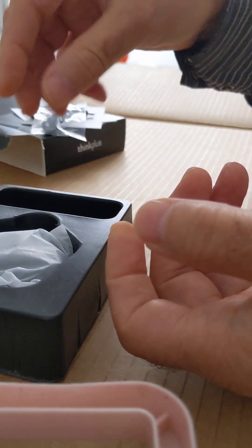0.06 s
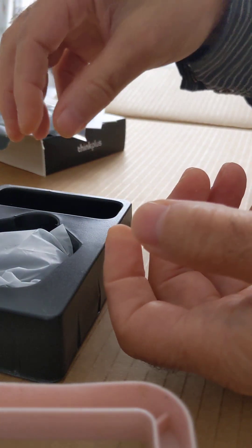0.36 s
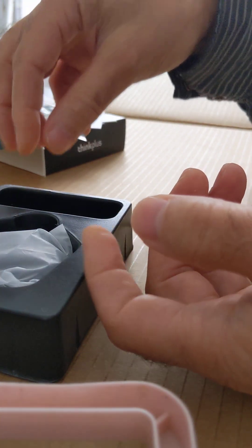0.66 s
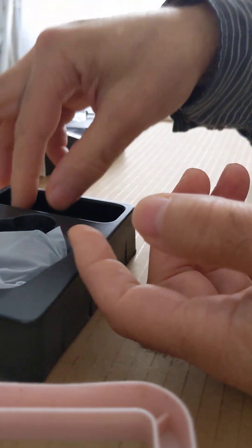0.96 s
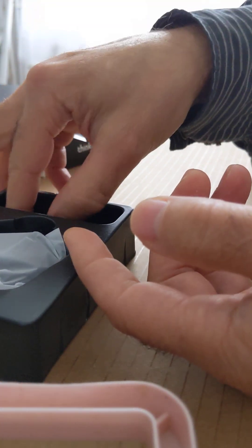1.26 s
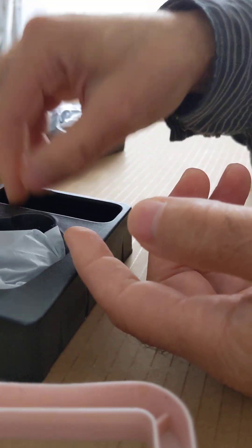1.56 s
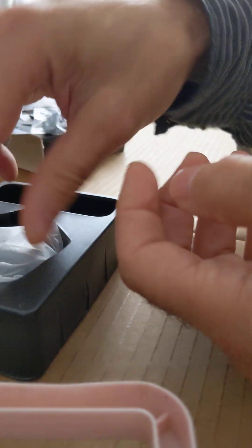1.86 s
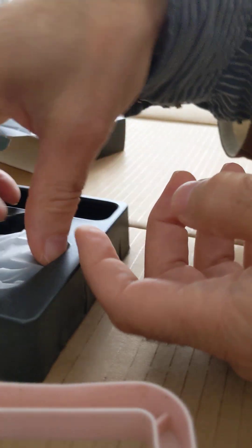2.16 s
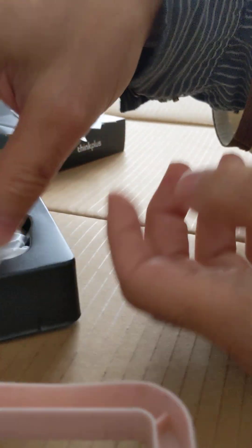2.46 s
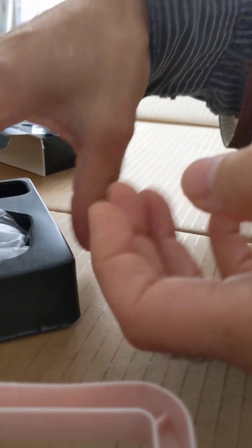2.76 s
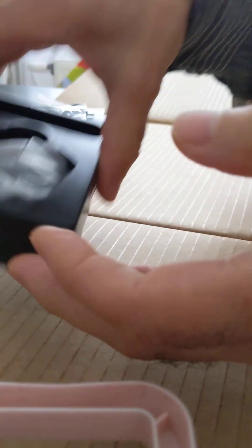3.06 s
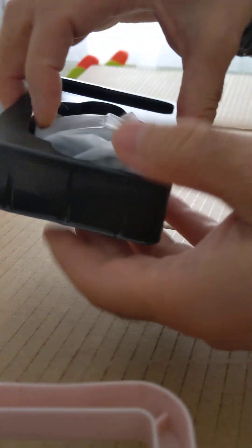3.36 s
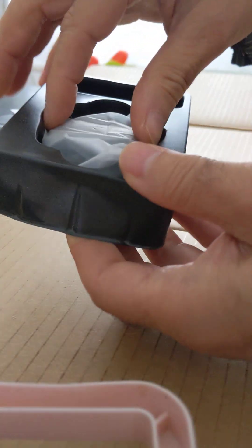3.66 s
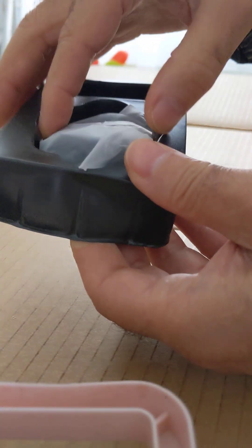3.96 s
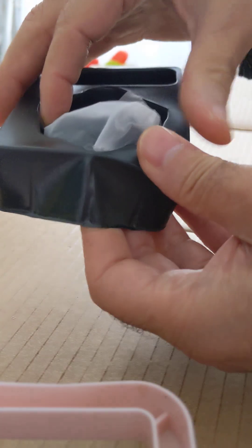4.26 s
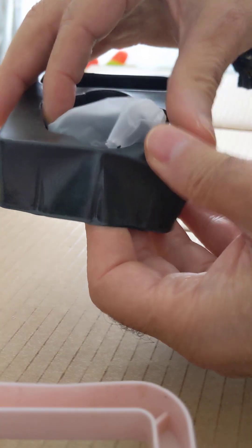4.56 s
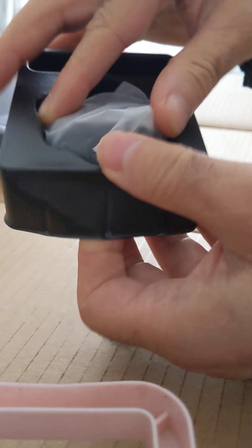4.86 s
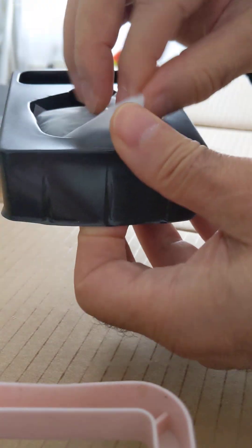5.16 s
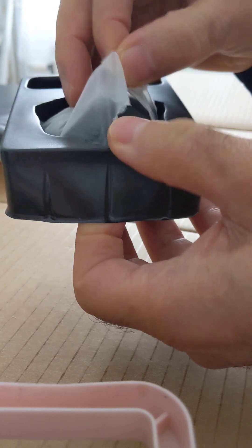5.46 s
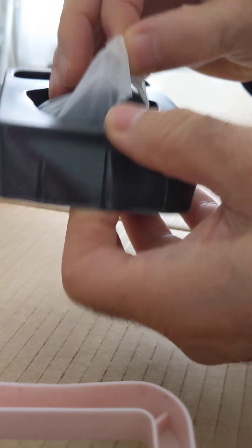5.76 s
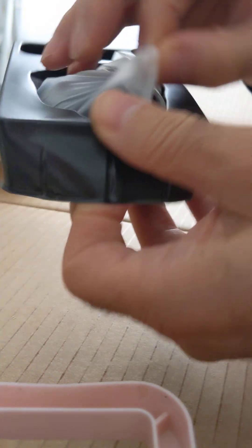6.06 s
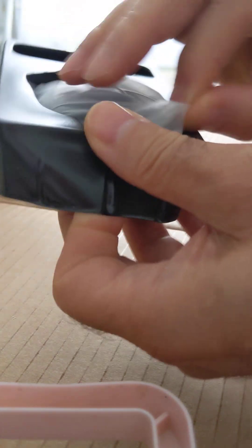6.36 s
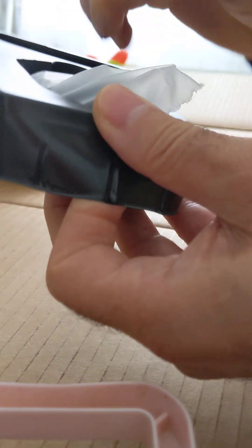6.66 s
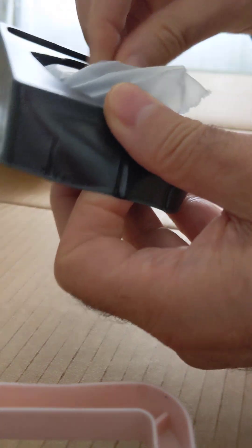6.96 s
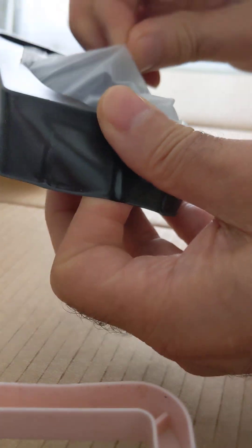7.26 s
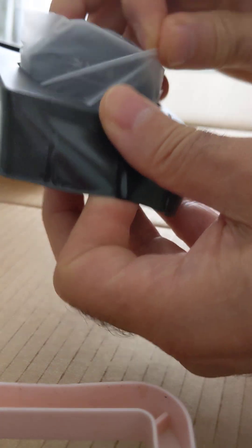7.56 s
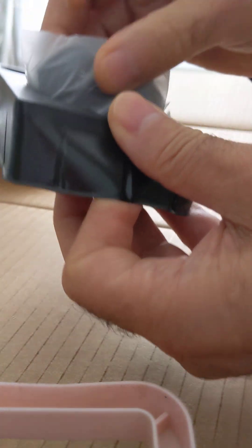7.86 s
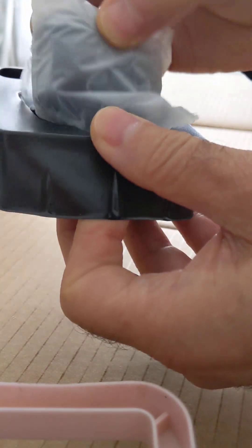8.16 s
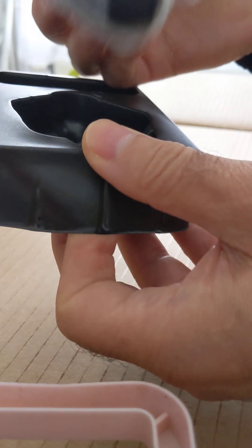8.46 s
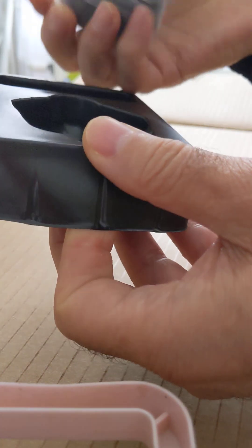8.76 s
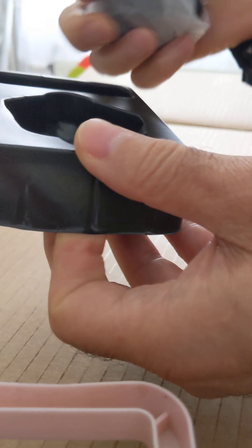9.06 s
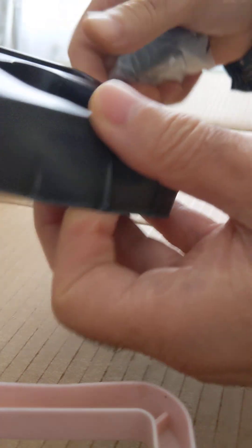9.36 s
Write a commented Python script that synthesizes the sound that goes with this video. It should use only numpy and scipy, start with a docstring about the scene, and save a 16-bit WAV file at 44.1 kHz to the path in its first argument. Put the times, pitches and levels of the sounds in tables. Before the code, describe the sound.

Close to the microphone in a small, quiet room, hands handle a moulded plastic tray. One loud, sharp snap like a static spark comes early. Fingers then rub, tap and briefly squeak on the tray, which bumps softly on cardboard. A thin plastic bag hisses and crackles in short tugs between hollow knocks, then comes free and crinkles more densely. A faint hum lies underneath.

```python
"""A small room, close to a phone: hands work an item in a thin plastic bag out of a moulded plastic tray.
Fingers rub, knock and squeak on the tray, which drums on a cardboard sheet; at each tug the film hisses
and crackles, and its creases flip. An early touch draws a loud snap, probably a static spark.
Near the end the bag comes free and resounds. Faint mains hum lies under it all."""
import sys
import numpy as np
from scipy import signal
from scipy.fft import rfft, irfft, next_fast_len
from scipy.io import wavfile

SR = 44100
rng = np.random.default_rng(int(sys.argv[2]) if len(sys.argv) > 2 else 0)


def dump_mix(stems):
    """Bounce the given channels to the path in sys.argv[1] as a 16-bit WAV at rate SR."""
    frames = np.atleast_2d(stems).T  # one column per channel
    limited = np.clip(frames, -1, 1)  # hard clip at full scale
    pcm = np.round(limited * 32767).astype(np.int16)
    wavfile.write(sys.argv[1], SR, pcm)


N = 414540
TIME = np.arange(N) / SR
HIT_TIME = TIME[:2048]


def undb(db):
    """Decibels to gain."""
    return 10 ** (np.asarray(db) / 20)


def unit(x):
    """Scale to rms 1."""
    return x / np.sqrt(np.mean(x ** 2))


def curve(table):
    """A (time, value) table, sample by sample."""
    return np.interp(TIME, *np.transpose(table))


def along(hz, points_hz, values):
    """Interpolate on a log-frequency axis."""
    return np.interp(np.log(hz + 1), np.log(points_hz), values)


def butter(x, order, hz, kind):
    """Causal Butterworth filter."""
    return signal.sosfilt(signal.butter(order, hz, kind, fs=SR, output="sos"), x)


def colour(x, spectrum):
    """Minimum-phase filter from a (frequency, gain) table, via the cepstrum."""
    size = next_fast_len(x.shape[-1] + 4096, real=True)
    gain_db = along(np.fft.rfftfreq(size, 1 / SR), *np.transpose(spectrum))
    cepstrum = irfft(np.log(undb(gain_db)), size)
    cepstrum[1:size // 2] *= 2
    cepstrum[size // 2 + 1:] = 0
    return irfft(rfft(x, size) * np.exp(rfft(cepstrum)), size)[..., :x.shape[-1]]


def resonance(x, hz, width_hz):
    """Narrow resonance with a moving centre; gain 1 at the centre."""
    turn = np.exp(2j * np.pi * np.cumsum(hz) / SR)
    pole = np.exp(-np.pi * width_hz / SR)
    return 2 * np.real(turn * signal.lfilter([1 - pole], [1, -pole], x / turn))


def walk(rate_hz):
    """Random wander, spread near 1."""
    knots = rng.standard_normal(int(N / SR * rate_hz) + 2)
    return np.interp(TIME * rate_hz, np.arange(len(knots)), knots)


def grains(per_s, spread_db, cap):
    """Random impulses of steady power, mostly small; sizes span cap * spread_db."""
    chance, size = rng.random(N), np.minimum(rng.exponential(size=N), cap)
    return unit((chance < per_s / SR) * undb(spread_db * size) * rng.choice([-1, 1], N) / np.sqrt(per_s))


def burst(envelope):
    """Short noise burst, whitened to an even spectrum."""
    x = rng.standard_normal(len(envelope)) * envelope
    for _ in range(4):
        spectrum = rfft(x)
        x = irfft(spectrum / (np.abs(spectrum) + 1e-12), len(x)) * np.sqrt(envelope)
    return unit(x)


def stroke(start_s, attack_s, hold_s, swell, release_s):
    """Gain of one hand movement: rises as time ** swell, holds, decays."""
    age = np.maximum(TIME - start_s, 0)
    release = np.exp(-np.clip((age - attack_s - hold_s) / release_s, 0, 20))
    return np.minimum(age / attack_s, 1) ** swell * release


def strokes(table, swell, release_s):
    """Summed power of all movements, and their last column weighted by power."""
    power, weighted = np.zeros((2, N))
    for start_s, attack_s, hold_s, db, quality in table:
        one = (undb(db) * stroke(start_s, attack_s, hold_s, swell, release_s)) ** 2
        power += one
        weighted += one * quality
    return power, weighted


def add(out, start_s, sound):
    """Mix in a stereo sound."""
    i = int(start_s * SR)
    out[:, i:i + sound.shape[1]] += sound[:, :N - i]


def ports(x, lag_ms, scatter, spread_ms):
    """Two microphone ports: the right hears later; each gets its own reflections off hands and tray."""
    age = TIME[:512]
    paths = rng.standard_normal((2, len(age))) * np.exp(-age * 1000 / spread_ms)
    paths *= scatter / np.linalg.norm(paths, axis=1, keepdims=True)
    paths[0, 0] += 1
    paths[1, int(lag_ms * SR / 1000 * rng.uniform(.5, 1.5))] += 1
    return signal.oaconvolve(x[None], paths, axes=1)[:, :len(x)] / np.sqrt(1 + scatter ** 2)


def moving_ports(x, lag_ms, scatter, spread_ms, size=8192):
    """The hands move, so each short stretch takes new paths to the ports."""
    out = np.zeros((2, N))
    for i in range(0, N - size // 4, size // 2):
        part = x[i:i + size]
        add(out, i / SR, ports(part * signal.windows.hann(size)[:len(part)], lag_ms, scatter, spread_ms))
    return out


def hit_level(pair, db, left_db):
    """Set a hit's rms over its first 4 ms, and its balance."""
    rms = np.sqrt(np.mean(pair[:, :int(.004 * SR)] ** 2, axis=1, keepdims=True))
    return pair / rms * undb(db) * unit(undb(np.array([[left_db], [-left_db]]) / 2))


# room air spectrum: (frequency [Hz], gain [dB])
AIR_COLOUR = [(100, 3), (240, -10.5), (430, -3), (750, -10.5), (1500, -14), (2800, -17), (4300, -19.5),
              (7000, -27.5), (10700, -19.5), (12000, -23), (16000, -28)]
# mains partials: (frequency [Hz], level [dB])
HUM_PARTIALS = [(48.5, -65.5), (97, -69), (194, -82.5)]


def background():
    """Still room air, slightly wavering mains hum and a low rumble."""
    air = colour(rng.standard_normal((2, N)) + .8 * rng.standard_normal(N), AIR_COLOUR)
    air = unit(butter(air, 2, 110, "high"))
    hum = sum(undb(db + walk(7.9)) * unit(np.sin(2 * np.pi * hz * TIME + .54 * walk(6.5)))
              for hz, db in HUM_PARTIALS)
    rumble_colour = [(15, -13.5), (45, -13), (110, -22.5), (300, -27.5), (900, -89.5)]
    rumble = unit(colour(rng.standard_normal(N), rumble_colour))
    return undb(-67.5) * air + hum + undb(-71) * rumble


# slides on the tray: (start [s], attack [s], hold [s], relative level [dB], relative brightness [dB])
SLIDES = [(.74, 0.013, 0.057, -58, -8.5), (1.02, 0.031, 0.0058, -53, -5), (1.515, 0.042, 0.01, -50, 4.5),
          (1.6, 0.0083, 0.096, -55, -0.5), (1.978, 0.005, 0.008, -39, 3), (2.005, 0.028, 0.022, -45.5, 7),
          (2.07, 0.02, 0.23, -55, -1), (2.3, 0.055, 0.017, -43.5, -2.5), (2.408, 0.0083, 0.026, -39, 0.5),
          (2.448, 0.012, 0.0033, -36.5, 11), (2.49, 0.0094, 0.019, -45, 4), (2.91, 0.03, 0.0096, -36.5, 2),
          (3.078, 0.028, 0.028, -40, 15), (3.382, 0.0075, 0.0078, -49.5, -1), (3.44, 0.076, 0.56, -63.5, 1),
          (3.965, 0.045, 0.013, -45.5, 5.5), (4.195, 0.03, 0.014, -57.5, 2),
          (4.621, 0.002, 0.0062, -51.5, -1), (4.705, 0.038, 0.022, -50.5, -10), (4.925, 0.019, 0.1, -53, 7),
          (5.17, 0.029, 0.0095, -40, 8), (5.285, 0.039, 0.0091, -42.5, 9), (5.525, 0.018, 0.026, -58, 4),
          (5.82, 0.04, 0.17, -61.5, -1), (6.0, 0.052, 0.032, -48.5, 4), (6.09, 0.041, 0.049, -52, 7),
          (6.345, 0.017, 0.014, -48, 9), (6.445, 0.034, 0.0077, -51.5, 9), (6.525, 0.027, 0.032, -55, 4.5),
          (6.844, 0.013, 0.034, -49.5, -15), (6.93, 0.022, 0.15, -56, 4), (7.12, 0.12, 0.061, -47, 6.5),
          (7.31, 0.14, 0.1, -47, 7), (7.61, 0.037, 0.04, -46.5, 9.5), (7.985, 0.012, 0.017, -47, 7.5),
          (8.02, .01, 0.054, -56.5, 6), (8.09, 0.028, 0.034, -51, 6),]
# friction spectrum: (frequency [Hz], gain [dB])
SLIDE_COLOUR = [(90, -20.5), (200, -15.5), (450, -8.5), (750, -2), (1500, -2), (2250, -1), (3200, -6),
                (4400, -8), (5500, -13.5), (8000, -18), (15000, -22)]
# resonance of the grip: (time [s], centre [Hz])
GRIP_RESONANCE = [(2.0, 1940), (4.0, 1980), (5.0, 930), (5.22, 875), (5.33, 1570), (6.15, 1630), (7.2, 990),
                  (8.1, 1140)]


def rubbing():
    """A finger or the wrapped item slides on the tray in surging micro-slips; faster is brighter."""
    power, weighted_db = strokes(SLIDES, swell=.7, release_s=.017)
    bright_db = weighted_db / (power + 1e-12)
    slips = grains(per_s=6000, spread_db=4, cap=4.5) * undb(2.6 * walk(110))
    body = unit(colour(slips, SLIDE_COLOUR))
    body = unit(body + undb(-1) * resonance(body, curve(GRIP_RESONANCE), width_hz=120))
    low = signal.sosfiltfilt(signal.butter(2, 1600, fs=SR, output="sos"), body)
    treble_gain = undb(bright_db - 3.5)
    slide = (low + treble_gain * (body - low)) / np.sqrt((1 + treble_gain ** 2) / 2)
    return moving_ports(slide * np.sqrt(power) * undb(5), lag_ms=.22, scatter=1, spread_ms=3.2)


# how firmly the tray rests on the cardboard: (time [s], coupling [dB])
BOARD_CONTACT = [(0, 4), (1.6, -0.5), (2.0, -2.5), (2.45, -4), (2.9, -2), (3.3, -10.5), (4.9, -11),
                 (5.3, -53)]
# cardboard response: (frequency [Hz], gain [dB])
BOARD_RESPONSE = [(40, -8.5), (120, 6.5), (250, 3.5), (420, 6.5), (560, 1), (900, -17), (3000, -50)]


def cardboard(tray):
    """The sheet drums along with the tray while they touch."""
    return colour(tray[0] * undb(curve(BOARD_CONTACT)), BOARD_RESPONSE)


# crease flips, and two sharp nail contacts as strokes start (2.916 s, 3.073 s): (time [s], level [dB], tilt
# centre [Hz])
CREASE_FLIPS = [(1.175, -47.5, 3800), (2.1734, -46, 7550), (2.226, -39.5, 5500), (2.24, -44, 5200),
                (2.4062, -37, 12000), (2.9163, -36, 2940), (3.073, -35, 2680), (3.4467, -44, 3520),
                (3.464, -43, 3000), (3.661, -48, 3600), (3.695, -47.5, 4800), (3.707, -51, 3300),
                (3.73, -52, 5000), (3.788, -46.5, 4040), (4.0379, -40, 3440), (4.2032, -48.5, 2930),
                (4.398, -51, 3200), (4.446, -57, 5800), (4.623, -49, 3800), (4.8543, -38.5, 7200),
                (4.914, -42, 6900), (5.021, -42.5, 8000), (5.074, -46.5, 7810), (5.6383, -46, 6850),
                (5.6596, -37.5, 11600), (5.7157, -39.5, 11200), (5.783, -43.5, 7200), (6.3685, -33, 7560),
                (6.3928, -39, 5220), (6.406, -32, 9200), (6.578, -44, 6430), (6.9874, -49, 7460),
                (7.044, -45, 10500), (7.0648, -35, 8300), (7.134, -38.5, 8200), (7.5598, -36.5, 10600),
                (7.59, -38, 9790), (7.6447, -41, 7100), (7.792, -42.5, 7560), (7.903, -41, 9930),
                (7.9295, -43.5, 9500), (8.1335, -37.5, 8100), (8.5845, -49, 6800), (8.6973, -46.5, 6840),
                (8.8436, -42.5, 9250), (8.865, -38, 6700), (8.881, -43, 6040), (8.9107, -42.5, 7140),
                (8.9328, -45, 7000), (8.9415, -47, 6940), (8.9915, -51, 8000), (9.1343, -48, 3520),
                (9.147, -39.5, 6760), (9.171, -37, 5950), (9.184, -37, 6600), (9.194, -47, 6500),
                (9.228, -37.5, 7400), (9.249, -46.5, 2350), (9.289, -47.5, 7500)]
# flip spectrum before tilt: (frequency [Hz], gain [dB])
FLIP_COLOUR = [(300, -13.5), (1200, -10.5), (2400, 0), (4500, 1), (7000, -1.5), (10000, 5), (13000, -1.5),
               (16000, -13)]


def creases():
    """A crease snaps through and the film around it shivers; smaller creases sound higher."""
    out = np.zeros((2, N))
    hz, film_db = np.transpose(FLIP_COLOUR)
    for start_s, db, centre_hz in CREASE_FLIPS:
        flip = rng.standard_normal(len(HIT_TIME)) * np.exp(-HIT_TIME / .0012)
        flip[0] += 7  # the snap
        tilt_db = 7 * np.log2(centre_hz / 7000) * np.log2(hz / centre_hz)
        tick = colour(flip, np.column_stack([hz, film_db + np.minimum(tilt_db, 6)]))
        pair = ports(tick, lag_ms=.2, scatter=.8, spread_ms=1.1)
        add(out, start_s, hit_level(pair, db, left_db=1.5))
    return out


# modes of the hollow between hand and tray: (frequency [Hz], gain [dB])
HOLLOW_MODES = [(480, -8.5), (1000, -10.5), (2360, 0.5), (2650, -3.5), (3830, -3.5), (4080, 3), (4560, 0),
                (6320, -4.5), (9070, -4.5)]
# spark spectrum: (frequency [Hz], gain [dB])
SNAP_COLOUR = [(200, -10.5), (500, -10.5), (1000, -8), (1500, -15), (2300, -5.5), (5000, -7.5),
               (10500, -1.5), (13500, -2.5), (16000, -11)]


def spark(start_s, hollow_t60_s=.011):
    """A static discharge: a very short, bright crack that rings the hollow."""
    out = np.zeros((2, N))
    envelope = (1 - np.exp(-HIT_TIME / .0004)) * np.exp(-(HIT_TIME / .0036) ** 1.3)
    mid, side = burst(envelope), burst(envelope)
    crack = np.stack([mid + side, mid - side])
    ring = np.zeros_like(crack)
    for hz, db in HOLLOW_MODES:
        q = np.pi * hz * hollow_t60_s / np.log(1000)
        ring += undb(db) * signal.lfilter(*signal.iirpeak(hz, q, fs=SR), crack)
    snap = colour(crack + 2 * ring, SNAP_COLOUR)
    add(out, start_s, hit_level(snap, db=-13.5, left_db=-2.5))
    return out


def spark_thump(start_s, rise_s=.0024):
    """The discharge kicks the two microphones in opposite directions; they swing back slowly."""
    age = np.maximum(TIME - start_s, 0) / rise_s
    kick = butter(age ** 2 * np.exp(-age), 2, 19, "high")
    return np.array([[-1], [.4]]) * undb(-18.5) * kick / kick.max()


def wrinkles(per_s, spread_db, cap, jitter_ms, lag_ms=.2):
    """Stereo grains: each wrinkle's position gives it its own delay to the right port."""
    left = grains(per_s, spread_db, cap)
    at = np.flatnonzero(left)
    lag = (lag_ms + jitter_ms * rng.laplace(size=N)[at]) * SR / 1000
    right = np.bincount(np.clip(at + np.round(lag).astype(int), 0, N - 1), left[at], N)
    return np.stack([left, right])


# tugs on the film: (start [s], attack [s], hold [s], relative level [dB], crackle share [0-1])
FILM_TUGS = [(1.52, 0.031, 0.011, -56, 0.1), (1.7, 0.098, 0.16, -62.5, 0),
             (1.976, 0.0041, 0.0071, -44.5, 0.27), (2.22, 0.098, 0.038, -52.5, 0.5),
             (2.412, 0.02, 0.02, -48, 0), (2.45, 0.0029, 0.0031, -37.5, 0.2),
             (2.49, 0.052, 0.012, -50.5, 0.8), (2.91, 0.026, 0.034, -50, 0), (3.44, 0.059, .42, -65, 0.5),
             (4.621, 0.004, .018, -56.5, 0.26), (4.775, 0.057, 0.031, -51, 0), (4.88, 0.02, 0.5, -60, 0.45),
             (5.155, 0.041, 0.014, -43.5, 0.37), (5.28, 0.028, 0.02, -54, 0.2),
             (5.36, .02, 0.076, -58, 0.74), (5.622, 0.0071, .002, -54.5, 0.6),
             (6.04, 0.0029, 0.01, -48.5, 0.1), (6.35, 0.0098, 0.034, -44, 0.06),
             (6.44, 0.063, 0.078, -56.5, 0), (6.845, 0.027, 0.059, -57.5, 0.1),
             (7.01, 0.049, 0.038, -53, 0.1), (7.1, 0.12, 0.12, -56.5, 0.7), (7.35, 0.26, 0.15, -52.5, 0.4),
             (7.985, 0.018, 0.029, -52, 0.3), (8.06, 0.07, 0.012, -63, 0.05), (8.2, 0.015, 0.26, -63, 0.1),
             (8.53, 0.01, 0.22, -61, 0), (8.805, 0.057, 0.07, -50.5, 0.18), (8.96, 0.014, 0.37, -60, 0.55),
             (9.08, 0.067, 0.084, -50, 0.65)]


def rustling(loose):
    """Film hisses as it slides over itself and crackles as wrinkles give way, more often once loose."""
    power, crackle_power = strokes(FILM_TUGS, swell=.41, release_s=.021)
    rest_power = undb(-77.5) ** 2  # the film keeps settling between tugs
    level = np.sqrt(power + rest_power)
    share = np.clip((crackle_power + .45 * rest_power) / (power + rest_power), 0, 1)
    hiss = wrinkles(per_s=4900, spread_db=4.5, cap=4.8, jitter_ms=.028) * undb(4 * walk(80))
    flips_per_s = 120 * (level / undb(-54)) ** .8 * 4 ** loose
    flips = wrinkles(flips_per_s, spread_db=11, cap=1.8, jitter_ms=.06)
    shiver = burst(np.exp(-HIT_TIME / .0004))
    crackle = signal.oaconvolve(flips, shiver[None] / np.linalg.norm(shiver), axes=1)[:, :N]
    return level * (undb(8) * np.sqrt(1 - share) * hiss + undb(7.5) * np.sqrt(share) * crackle)


# film spectrum: (frequency [Hz], gain [dB])
FILM_RESPONSE = [(300, -17), (1200, -2), (1800, -2.5), (2400, 1), (3400, -3), (4500, -2), (7000, -5.5),
                 (10000, -2), (13000, -7), (16000, -15)]


def film(rustle):
    """The thin film radiates its rustle with little bass."""
    return colour(rustle, FILM_RESPONSE)


# taps and wall buckles: (time [s], level [dB], panel note [Hz], crack re panel note [dB],
# ring time under the fingers re free tray [ratio])
TRAY_KNOCKS = [(1.614, -42.5, 1830, -23, 1), (1.6996, -41.5, 1060, -4.5, 0.97), (1.909, -47, 900, -22, 1),
               (1.9798, -32, 620, -8, 1), (1.9859, -27.5, 1960, -12, 0.94), (1.9913, -36, 714, -2, 0.86),
               (2.062, -48, 2100, -8, .6), (2.1529, -33.5, 1270, -32, 0.7), (2.3095, -36.5, 2450, -17, 0.9),
               (2.32, -48, 1800, -3, .6), (2.3364, -36, 1900, -15, .7), (2.419, -38, 1720, -19, 1),
               (2.458, -37, 2100, 16, .6), (2.504, -41, 950, -10, 0.96), (2.613, -49.5, 910, -20, 0.93),
               (2.682, -52.5, 864, -27, 0.86), (3.3934, -48.5, 1490, -12, 0.92),
               (3.524, -58, 1990, 15, 0.53), (3.612, -48.5, 1410, 0, 0.65), (3.86, -51.5, 2140, -5, 1),
               (3.94, -35.5, 800, -35, 1), (4.0355, -38.5, 2070, 7, 0.84), (4.2276, -39, 983, -21, 0.74),
               (4.7114, -40, 1350, -8, 1), (4.738, -35.5, 1960, -13, 0.59), (4.9684, -27, 840, -1, 0.81),
               (6.0005, -42, 1530, 1, 1), (6.0441, -28, 1650, -8, 0.16), (6.6374, -24.5, 1705, 3, 0.81),
               (6.849, -41.5, 1690, 7, 0.91), (6.8795, -32, 2010, 6.5, 0.82), (7.0158, -40, 1600, 1, 1),
               (7.2965, -38.5, 1910, -1, 1), (7.8244, -30.5, 1600, -2.5, 0.49),
               (8.0864, -40.5, 720, -15, 0.94)]
# tray modes: (frequency [Hz], gain [dB], t60 [s])
TRAY_MODES = [(373, 9.5, 0.0069), (494, 3, 0.041), (748, 2, 0.024), (1080, 5.5, 0.011), (1200, -0.5, 0.017),
              (1427, 2, 0.015), (2100, 4, 0.0082), (2328, 1, 0.032), (2800, 0, 0.0038), (3770, -25, 0.0019),
              (3870, -1, 0.0035)]


def knocks(panel_t60_s=.026, crack_band_hz=(1620, 4680)):
    """Each blow cracks, then rings the struck panel and the tray modes near its note."""
    out = np.zeros((2, N))
    hz, mode_db, t60_s = np.transpose(TRAY_MODES)
    for start_s, db, panel_hz, crack_db, free in TRAY_KNOCKS:
        gripped_hz = hz * (1 + .076 * rng.standard_normal(len(hz)))  # the grip detunes the thin walls
        decay = undb(-60 * HIT_TIME / (free * t60_s[:, None]))
        modes = np.sin(2 * np.pi * gripped_hz[:, None] * HIT_TIME) * decay
        weight = undb(mode_db) / (1 + (np.log2(hz / panel_hz) / 2.65) ** 2)
        ring = (weight * (-1) ** np.arange(len(hz))) @ modes  # neighbouring modes swing opposite ways
        panel = np.sin(2 * np.pi * panel_hz * HIT_TIME) * undb(-60 * HIT_TIME / (free * panel_t60_s))
        contact = burst(np.exp(-HIT_TIME / .00037))
        crack = butter(contact, 3, crack_band_hz, "band") + undb(-28) * contact
        knock = free * unit(ring) + unit(panel) + undb(crack_db) * unit(crack)
        knock = butter(knock, 3, .3 * panel_hz, "high")  # a smaller patch of wall radiates less bass
        pair = ports(knock, lag_ms=.12, scatter=.77, spread_ms=1.7)
        left_db = -.5 - 1.2 * np.log2(panel_hz / 1500)  # dull taps left, sharp ones right
        add(out, start_s, hit_level(pair, db, left_db))
    return out


# bumps on the cardboard: (time [s], relative level [dB])
BOARD_BUMPS = [(1.7, -52.5), (1.985, -50.5), (2.296, -49.5), (2.463, -54), (3.19, -55)]
# low cardboard modes: (frequency [Hz], gain [dB], t60 [s])
BOARD_MODES = [(30.8, 2, 0.24), (64, -1.5, 0.51), (85, 0, .18), (120, -5, 0.19)]


def bumps():
    """The tray or a hand bumps the sheet: a soft, deep thud."""
    out = np.zeros((2, N))
    age = TIME[:SR // 2]
    for start_s, db in BOARD_BUMPS:
        thud = np.zeros(len(age))
        for hz, mode_db, t60_s in BOARD_MODES:
            detuned_hz = hz * (1 + .14 * rng.standard_normal())
            thud += undb(mode_db - 60 * age / t60_s) * np.sin(2 * np.pi * detuned_hz * age)
        add(out, start_s, undb(db) * np.stack([thud, thud]))
    return out


# skin catching on the rim: (start [s], attack [s], hold [s], level [dB], pitch [Hz])
RIM_SQUEAKS = [(2.303, .012, 0.011, -36.5, 5150), (2.452, 0.0074, .004, -35.5, 4950),
               (3.38, 0.0059, 0.015, -43.5, 4580), (4.002, 0.031, 0.0046, -40, 4270),
               (4.622, 0.0027, 0.02, -48, 4200), (4.776, 0.031, 0.045, -49.5, 4340),
               (5.295, 0.015, 0.023, -40, 4070), (7.963, 0.012, 0.15, -58, 4550)]


def squeaks():
    """Irregular stick-slip rings one narrow resonance of the tray's rim."""
    out = np.zeros(N)
    slips = grains(per_s=1500, spread_db=9, cap=2.6)
    for start_s, attack_s, hold_s, db, hz in RIM_SQUEAKS:
        ring = unit(signal.lfilter(*signal.iirpeak(hz, Q=20, fs=SR), slips))
        out += undb(db) * ring * stroke(start_s, attack_s, hold_s, swell=1, release_s=.0039)
    return moving_ports(out, lag_ms=.13, scatter=1, spread_ms=1.2)


# body of the loose bag: (frequency [Hz], gain [dB])
BAG_RESPONSE = [(1000, -37), (1900, -6), (2350, 3), (2900, -8), (4000, -17), (7000, -30)]


def bag(x, loose):
    """Once free, the bag resounds with every sound of its film."""
    return x + colour(x * loose, BAG_RESPONSE)


# reverberation: (band [Hz], t60 [s], level re input [dB])
ROOM_BANDS = [(152, 0.19, -13.5), (600, 0.99, -8.5), (1410, 0.69, -10.5), (2360, 0.51, -10),
              (4500, 0.6, -13.5), (9300, 0.47, -12.5), (15000, 0.31, -12)]


def room(x, gap_s, early_db, early_s, size=32768):
    """The walls answer after a gap, strongly at first, then diffusely; paths change as the hands move."""
    hz, t60_s, db = np.transpose(ROOM_BANDS)
    age = TIME[:size // 2]
    bins_hz = np.fft.rfftfreq(len(age), 1 / SR)
    bands = np.array([along(bins_hz, hz, band) for band in np.eye(len(hz))])
    fades = undb(-60 * age / t60_s[:, None]) * (1 + undb(early_db) * np.exp(-age / early_s))
    fades *= (undb(db) / np.linalg.norm(fades, axis=1))[:, None]
    out = np.zeros((2, N))
    for i in range(0, N - size // 8, size // 2):
        band_noise = irfft(rfft(rng.standard_normal((2, 1, len(age)))) * bands)
        tail = np.sum(band_noise * fades, axis=1)
        part = x[:, i:i + size]
        part = part * signal.windows.cosine(size)[:part.shape[1]]
        add(out, i / SR + gap_s, signal.fftconvolve(part, tail, axes=1))
    return out


def scene(spark_s=1.2428, bag_out_s=8.3):
    """Tray, bag and spark with their reverberation, over the background."""
    loose = np.clip((TIME - bag_out_s) * 2, 0, 1)  # 0 in the tray, 1 free
    tray = rubbing() + squeaks() + knocks()
    handling = tray + cardboard(tray) + bag(film(rustling(loose)), loose)
    ticks, snap = bag(creases(), loose), spark(spark_s)
    far_snap = butter(snap, 2, 900, "high")  # little of the small spark's bass reaches the walls
    walls = room(handling + undb(3) * ticks + undb(5) * far_snap, gap_s=.0105, early_db=6, early_s=.014)
    return handling + ticks + snap + walls + spark_thump(spark_s) + bumps() + background()


def record(dry, top_hz=16100):
    """The phone rounds the highest peak and cuts the top."""
    return signal.sosfilt(signal.ellip(8, .2, 70, top_hz, fs=SR, output="sos"), np.tanh(dry))


dry = scene()
out = record(dry)
dump_mix(out)
```